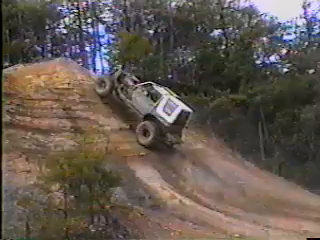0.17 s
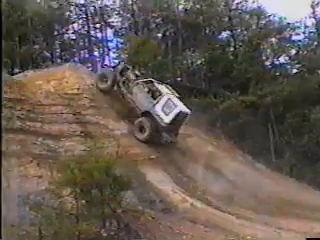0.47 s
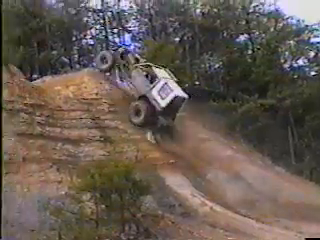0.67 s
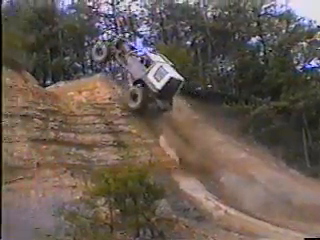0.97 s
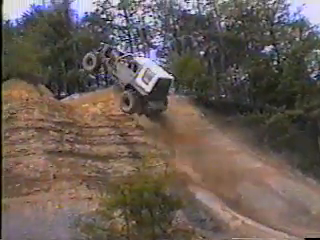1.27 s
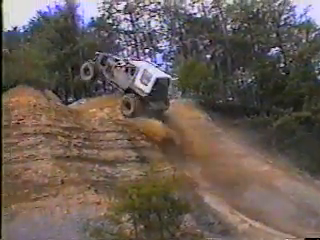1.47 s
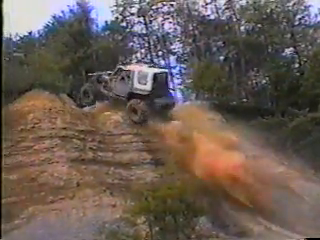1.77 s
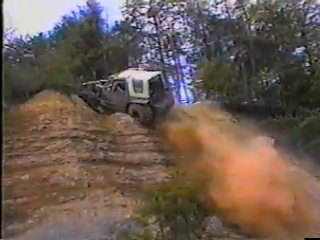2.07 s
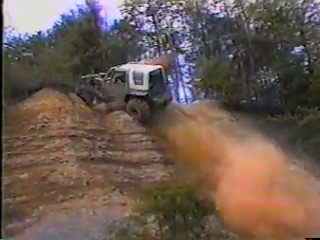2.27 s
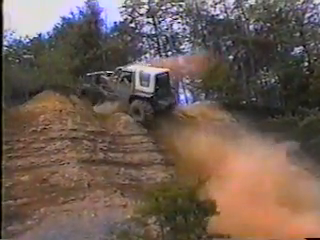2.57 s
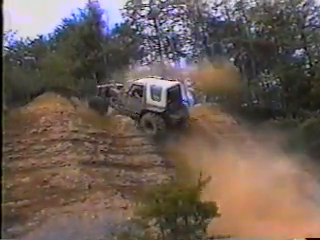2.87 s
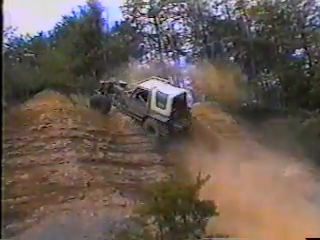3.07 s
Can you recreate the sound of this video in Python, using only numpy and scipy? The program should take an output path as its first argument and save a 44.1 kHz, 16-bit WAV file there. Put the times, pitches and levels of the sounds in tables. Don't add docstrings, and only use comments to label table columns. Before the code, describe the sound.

A big off-road engine with open pipes is already roaring at 0 s, raspy and noisy, with valve clatter and brief ringing whistles. Revs dip near 0.8 s, climb to a peak around 1.1-1.5, and sag by 1.7. The throttle shuts at 2.1; pops crackle, with a short burst at 2.35. Near idle at 2.5-2.8, then a lower roar returns from 2.9 to the end. Soil hisses throughout; clods thud after 2.6. Distant, band-limited mono.

```python
import sys
import numpy as np
from scipy import signal
from scipy.fft import rfft, irfft, next_fast_len
from scipy.io import wavfile
from scipy.ndimage import uniform_filter1d, map_coordinates

SR = 44100
rng = np.random.default_rng(int(sys.argv[2]) if len(sys.argv) > 2 else 0)


def transcribe(signal):
    frames = np.atleast_2d(signal).T
    limited = np.clip(frames, -1, 1)
    pcm = np.round(limited * 32767).astype(np.int16)
    wavfile.write(sys.argv[1], SR, pcm)


def amplitude_ratio(level_db):
    exponent = np.asarray(level_db, float) / 20
    return 10 ** exponent


N = 141561

# freq_hz, density_db_per_hz
BLAST_SPECTRUM = [(53, -53), (90, -36), (646, -4.5), (1730, -6), (2810, -1.5), (4550, -1), (5600, -9),
                  (7280, -35), (12300, -120)]
# freq_hz, level_db
RATTLE_SPECTRUM = [(900, -40), (1400, -3.5), (1800, -9), (2800, -1), (4600, -3.5), (6000, -23)]


def unit(x):
    return x / np.sqrt(np.mean(x ** 2) + 1e-20)


def curves(rows):
    knot_s, *columns = np.transpose(rows)
    t = np.arange(N) / SR
    return [np.interp(t, knot_s, column) for column in columns]


def colour(x, points):
    m = 2 * next_fast_len(N // 2 + SR // 4)
    f_hz, level_db = np.transpose(points)
    log_hz = np.log(np.fft.rfftfreq(m, 1 / SR) + 1)
    log_gain = np.interp(log_hz, np.log(f_hz), level_db) * np.log(10) / 20
    cepstrum = irfft(log_gain, m)
    cepstrum[1:m // 2] *= 2
    cepstrum[m // 2 + 1:] = 0
    return irfft(rfft(x, m) * np.exp(rfft(cepstrum)), m)[:N]


def wobble(rate_hz):
    coarse = np.arange(0, N + 32, 32)
    knots = rng.standard_normal(int(N * rate_hz / SR) + 4)
    return np.interp(np.arange(N), coarse, map_coordinates(knots, [coarse * rate_hz / SR]))


def patchy(patchy_db):
    z = signal.stft(rng.standard_normal(N), nperseg=512)[2]
    field = uniform_filter1d(rng.standard_normal(z.shape), 4, 0)
    field = uniform_filter1d(field, 8, 1)
    return signal.istft(z * amplitude_ratio(patchy_db * unit(field)), nperseg=512)[1][:N]


def dirt():
    hiss_db, grit_db, stones_per_s = -36.5, -48, 600
    # freq_hz, density_db_per_hz
    soil_spectrum = [(53, -58.5), (90, -37), (292, -2.5), (384, -8.5), (1070, -12), (1290, -10.5),
                     (5600, -14.5), (7280, -33.5), (12300, -120)]
    # time_s, level_db
    clod_levels = [
        (2, -73.5),
        (2.6, -56.5),
        (2.95, -47),
        (3.21, -52.5),
    ]
    clod_spectrum = [(50, -29.0), (95, -1.5), (170, -1.0), (330, -10), (600, -57.5)]

    hiss = unit(colour(patchy(patchy_db=1.5), soil_spectrum))
    thud = unit(colour(rng.standard_normal(N), clod_spectrum))
    stones = rng.standard_normal(N) * (rng.random(N) < stones_per_s / SR)
    grit = unit(colour(stones, RATTLE_SPECTRUM))

    out = amplitude_ratio(hiss_db + 0.94 * wobble(25.09)) * hiss
    out += amplitude_ratio(grit_db + 3.3 * wobble(18)) * grit
    return out + amplitude_ratio(curves(clod_levels)[0] + 3 * wobble(17)) * thud


def flares():
    # centre_s, level_db, pitch_hz, glide_hz_per_s, length_ms
    whistles = [(.44, -25.5, 762, -1.5, 18), (.91, -27.5, 1368, 1500, 22), (1.09, -26, 778, -1, 17),
                (1.3247, -25, 1490, 0, 18), (1.755, -22.5, 2334, 5000, 18), (1.8197, -26, 2765, 0, 31),
                (2.062, -31.5, 1380, -500, 20), (2.33, -29, 1954, 0, 15), (2.335, -30.5, 2515, 0, 14),
                (2.368, -28.5, 1910, 0, 11), (2.365, -32.5, 710, 0, 12), (2.7604, -32, 1004, -1500, 15),
                (2.8303, -35.5, 454, 0, 25), (2.895, -28.5, 562, 1002, 15), (2.9007, -30.5, 1065, 504, 22),
                (2.9896, -32, 1037, -300, 31), (3.17, -30.5, 792, 500, 22), (.27, -28.5, 2660, 1, 22),
                (.96, -28.5, 2190, -0.5, 35), (1.03, -28.5, 2900, 500.5, 43), (1.4, -26.5, 2790, 0, 30),
                (1.48, -30, 2850, -1, 34), (1.92, -28, 1440, 298.5, 50), (1.88, -34.5, 710, 300, 45),
                (2.96, -27.5, 575, 0, 15), (.98, -31.5, 520, 1500.5, 33), (2.0, -27, 2800, -1500, 40),
                (.78, -28, 680, -200, 70), (.16, -28.5, 750, 0, 55)]
    t = np.arange(N) / SR
    shake_rad = 0.67 * wobble(90)
    rasp = amplitude_ratio(2.5 * wobble(70))
    out = np.zeros(N)
    for centre_s, level_db, pitch_hz, glide_hz_per_s, length_ms in whistles:
        u = t - centre_s
        swell = np.exp(-(u * 1000 / length_ms) ** 2)
        phase = 2 * np.pi * (pitch_hz + glide_hz_per_s * u / 2) * u
        out += amplitude_ratio(level_db) * swell * np.sin(phase + shake_rad)
    return rasp * out


def pops():
    # peak_s, peak_db, ring_hz, length_ms
    burns = [(2.195, -26, 4660, 7), (2.405, -23, 4600, 12), (2.23, -26, 2330, 5.3), (2.288, -16.5, 2370, 7),
             (2.583, -29, 1064, 8.1), (2.614, -27.5, 4150, 3), (2.829, -26, 4600, 3), (2.752, -30, 3730, 4),
             (2.639, -21, 1822, 4.6), (2.687, -24, 1795, 5.8), (2.726, -20, 1770, 2.9),
             (2.761, -19.5, 3440, 15), (2.766, -29, 986, 14), (2.875, -19, 1060, 10)]
    t = np.arange(N) / SR
    puff = unit(colour(rng.standard_normal(N), BLAST_SPECTRUM))
    shake_rad = 2 * wobble(220)
    out = np.zeros(N)
    for peak_s, peak_db, ring_hz, length_ms in burns:
        u = (t - peak_s) * 1000 / length_ms
        swell = np.exp(-np.where(u < 0, 1.6, .9) * np.abs(u))
        ring = np.sin(2 * np.pi * ring_hz * t + shake_rad)
        out += amplitude_ratio(peak_db - 7.5) * swell * (puff + ring)
    return out


def clatter(turn_rad):
    cycles = (turn_rad + .012 * wobble(40)) / (2 * np.pi)
    place = (cycles % 1 * 256).astype(int)
    patterns = rng.standard_normal((3, 256))
    rattle = sum(wobble(7) * pattern[place] for pattern in patterns)
    return unit(colour(rattle, RATTLE_SPECTRUM))


def pipe(x):
    low_width_hz, panel_width_hz = 129, 90
    # time_s, low_mode_hz, low_lift_db,
    # upper_step_hz, upper_depth (1 = full upper lift)
    pipe_modes = [(.05, 705, 12.5, 679, 1.06), (.17, 758, 16.5, 680, 0.93), (.3, 685, 7, 676, 1),
                  (.45, 780, 9, 693, .9), (.62, 697, 11, 685, 1), (.8, 680, 11.5, 705, 1.09),
                  (.92, 624, 8, 698, 1.1), (1.1, 593, 8, 740, 0.8), (1.22, 568, 11.5, 637, .6),
                  (1.4, 592, 13, 710, 1.1), (1.6, 558, 8, 747, 0.5), (1.66, 545, 7.5, 564, 0.8),
                  (1.72, 540, 11, 557, 1.1), (1.755, 611, 15.5, 588, 1.2), (1.79, 635, 15, 674, 1.22),
                  (1.9, 748, 7.5, 710, 1.41), (2.08, 615, 6, 683, 1.05),
                  (2.14, 610, 3, 650, .25),
        (2.24, 603, 6, 616, 1.1),
        (2.4, 650, 2.9, 618, 1.2),
        (2.64, 650, 3, 632, 0.15),
        (2.82, 450, 7.2, 500, 0.6),
        (2.88, 570, 5.8, 534, 0.34),
        (2.97, 562, 11, 590, 0.82),
        (3.06, 600, 4.8, 594, 1),
        (3.21, 565, 2, 657, 0.7),
    ]
    # step_multiple, width_hz, lift_db
    upper_modes = [(2.07, 136, 8.5), (3.05, 243, 7.5), (3.97, 384, 7)]
    # time_s, mode_hz, lift_db
    panel_modes = [(.5, 867, 1), (.66, 873, 11), (.76, 777, 8), (.82, 740, 1), (.9, 700, 3), (.95, 900, 4),
                   (1, 910, 12.5), (1.05, 900, 0.5), (1.09, 780, 7.5), (1.22, 760, -4), (1.38, 790, 8),
                   (1.55, 784, -5), (2.2, 900, -1), (2.32, 885, 5.5), (2.5, 1010, -3), (2.84, 1050, 8),
                   (2.91, 1070, 9), (2.96, 1170, 3.5), (3.03, 1270, 5), (3.1, 1340, 3.5), (3.2, 1400, 1.5)]

    hz, t, z = signal.stft(x, SR, nperseg=2048, noverlap=1792)
    at = np.minimum((t * SR).astype(int), N - 1)

    def bell(centre_hz, width_hz):
        return 1 / (1 + (2 * (hz[:, None] - centre_hz) / width_hz) ** 2)

    low_hz, low_db, step_hz, depth = [c[at] for c in curves(pipe_modes)]
    panel_hz, panel_db = [c[at] for c in curves(panel_modes)]
    lift_db = low_db * bell(low_hz, low_width_hz)
    for multiple, width_hz, mode_db in upper_modes:
        lift_db = lift_db + depth * mode_db * bell(multiple * step_hz, width_hz)
    lift_db = lift_db + panel_db * bell(panel_hz, panel_width_hz)
    return signal.istft(z * amplitude_ratio(lift_db), SR, nperseg=2048, noverlap=1792)[1][:N]


def engine():
    cylinders, blur_rad, puff_depth = 8, .03, 0.11
    flicker_db, flutter_db, firing_db, clatter_db = 3.2, 1.6, -8, -8.5
    # time_s, cycles_per_s
    engine_speed = [(.05, 42.5), (.14, 42.8), (.25, 45.2), (.4, 48.8), (.55, 46.4), (.68, 46.1), (.78, 42.2),
                    (.84, 42.3), (1.04, 54.3), (1.13, 56.1), (1.24, 54.7), (1.34, 56.1), (1.49, 54.6),
                    (1.73, 40), (1.84, 43.1), (1.93, 43.6), (2.05, 41.5), (2.27, 35.2),
                    (2.4, 36.3),
        (2.65, 27.6),
        (2.81, 20.6),
        (2.901, 21.6),
        (3.05, 23),
        (3.21, 31.3),
    ]
    # time_s, loudness_db, tone_over_blast_db, even_firing_beat_db
    throttle = [(.05, -19.5, 0, -7), (.44, -20.5, 2, 5), (.55, -23.5, 4, 1), (.75, -20.5, 2.5, 1),
                (1.1, -20.5, 0.5, 3.5), (1.2, -21.5, -4, -4), (1.27, -21.5, 2, 1), (1.3, -20, 3, 4.5),
                (1.4, -19.5, 0.5, 2.5), (1.47, -22.5, -4, 3.5), (1.5, -20.5, -5, -3),
                (1.57, -24, -10.5, -16.5), (1.61, -23, -3.5, -7), (1.7, -22.5, -4.5, -2),
                (1.75, -19, -2, 10.5), (2.03, -22, 0, 2), (2.13, -31, 2.5, -8), (2.22, -31, 0.5, -1),
                (2.24, -28.5, 2.5, 1.5), (2.275, -28, 7.5, -7.5), (2.305, -27.5, 8.5, -7),
                (2.33, -23, 4, -5), (2.4, -25, 3.5, -2.5), (2.43, -29.5, 2, -3), (2.47, -35, -1, -1),
                (2.6, -36.5, 0, -5), (2.81, -34.5, 6, -7), (2.88, -22, -4.5, -2.5),
                (2.925, -24, -1.5, -2.5), (2.95, -21.5, -1.5, 1), (3.05, -22, 3, 2.5), (3.2, -21, 2, 1)]
    # cycle_multiple, level_db
    orders = [(4, -19), (5, -8), (6, -8), (7, -14), (8, -5.5), (9, -13.5), (10, -10.5), (11, -6.5),
              (12, -7.5), (13, -9.5), (14, -6.5), (15, -2.5), (16, -8.5), (17, -9), (18, -7.5), (19, -9.5),
              (20, -8.5), (21, -14), (22, -12.5), (23, -7), (24, -14), (25, -14.5), (26, -6), (27, -8),
              (28, -13), (29, -13), (30, -9.5), (31, -13.5), (32, -18), (33, -10)]

    speed_hz = uniform_filter1d(curves(engine_speed)[0], size=SR // 40)
    turn_rad = 2 * np.pi * np.cumsum(speed_hz) / SR
    loud_db, share_db, beat_db = curves(throttle)

    tone = np.zeros(N)
    for k, order_db in orders:
        level_db = order_db + beat_db * (k == cylinders)
        level_db = level_db + flicker_db * wobble(8) + flutter_db * wobble(27.99)
        phase = k * (turn_rad + blur_rad * wobble(30)) + 2 * np.pi * rng.random()
        tone += amplitude_ratio(level_db) * np.sin(phase)
    tone = unit(colour(tone, [(130, -27.5), (200, -0.7), (900, -2.3), (1800, -3)]))

    beat = 0.76 * np.cos(cylinders * turn_rad) + .5 * np.cos(turn_rad) + 0.22 * np.cos(3 * turn_rad)
    puffs = 1 + puff_depth * beat
    blast = unit(colour(patchy(patchy_db=1.0) * puffs, BLAST_SPECTRUM))

    mix = blast * amplitude_ratio(.7 * wobble(14) + 0.88 * wobble(60))
    mix += amplitude_ratio(firing_db + share_db) * tone
    mix += amplitude_ratio(clatter_db + share_db) * clatter(turn_rad)
    mix = pipe(mix)
    slow_rms = np.sqrt(np.abs(uniform_filter1d(mix ** 2, size=SR // 6)))
    return mix / slow_rms * amplitude_ratio(loud_db + 0.27 * wobble(6.955))


def scene():
    return np.tile(engine() + pops() + flares() + dirt(), (2, 1))


def low_pass(x):
    return signal.sosfilt(signal.butter(12, 7660, fs=SR, output="sos"), x)


def record(dry):
    ceiling, hum_db, offset, start_s = .25, -88, -.001, 0.04473
    # freq_hz, gain_db
    tape_response = [(65, -28), (130, -3.5), (5000, 0.48), (5600, -6.5), (6600, -2), (7200, -10.5),
                     (7700, -20.5), (8100, -88.5)]
    x = dry[0] / (1 + np.abs(dry[0] / ceiling) ** 4) ** (1 / 4)
    hum = unit(colour(rng.standard_normal(N), [(70, -3.5), (200, -26.5), (400, -85.5)]))
    x = colour(x, tape_response) + amplitude_ratio(hum_db) * hum
    x = (x + offset) * (np.arange(N) > start_s * SR)
    return low_pass(np.tile(x, (2, 1)))


dry = scene()
out = record(dry)
transcribe(out)
```